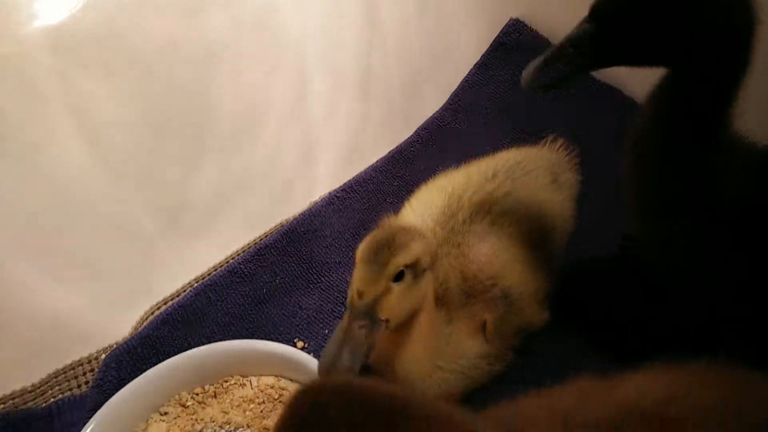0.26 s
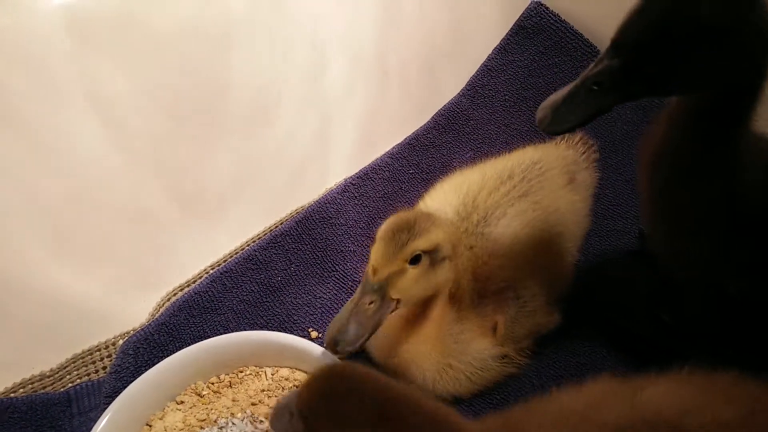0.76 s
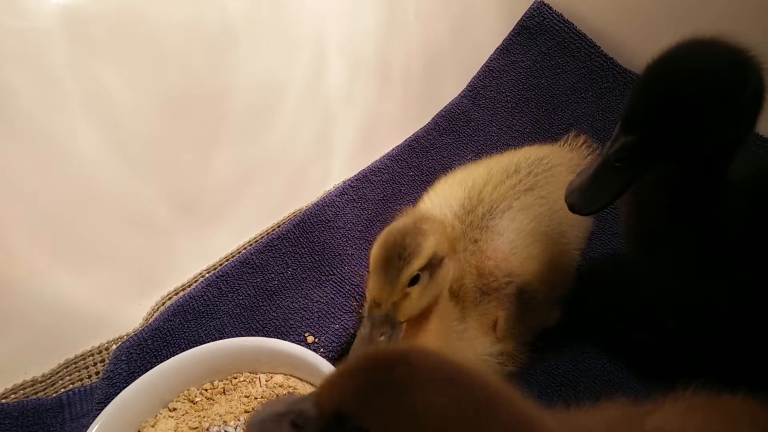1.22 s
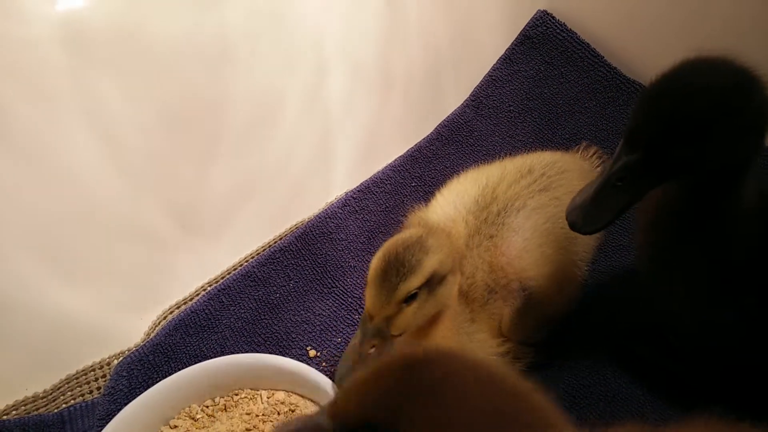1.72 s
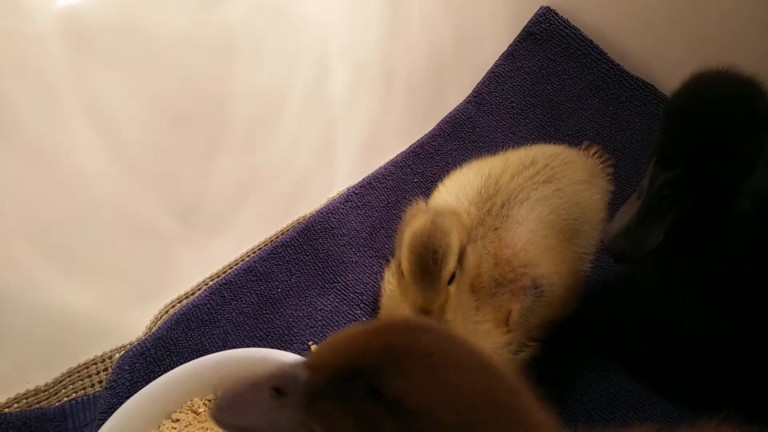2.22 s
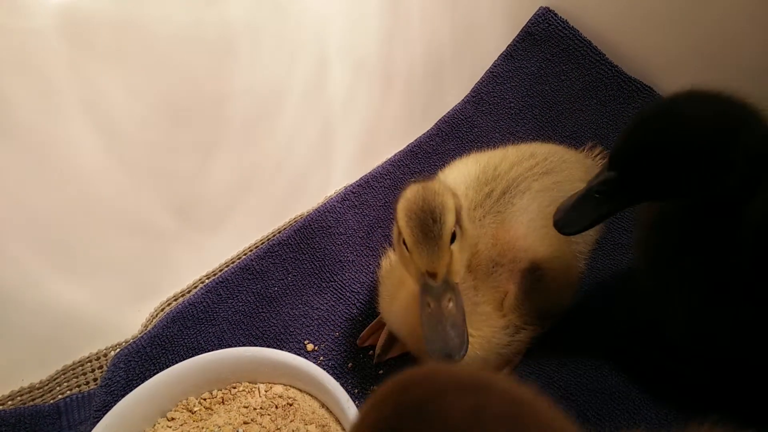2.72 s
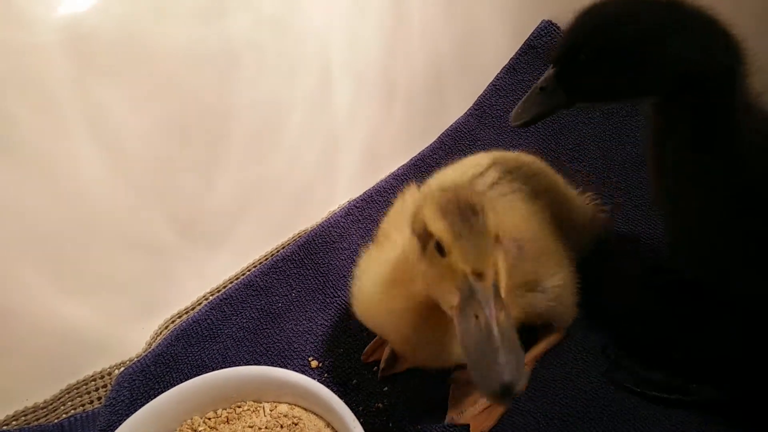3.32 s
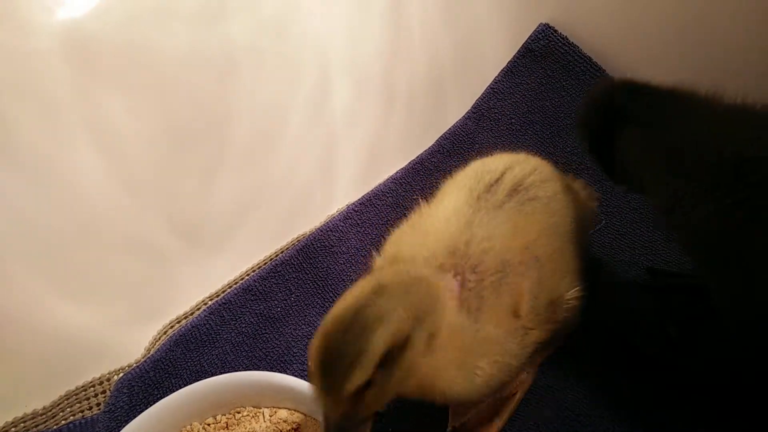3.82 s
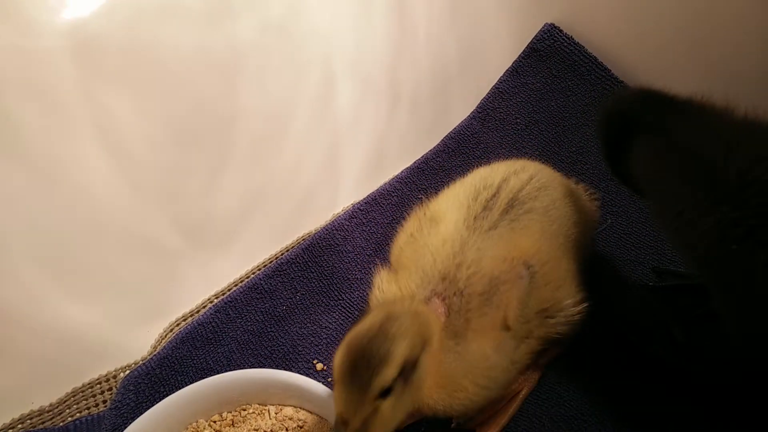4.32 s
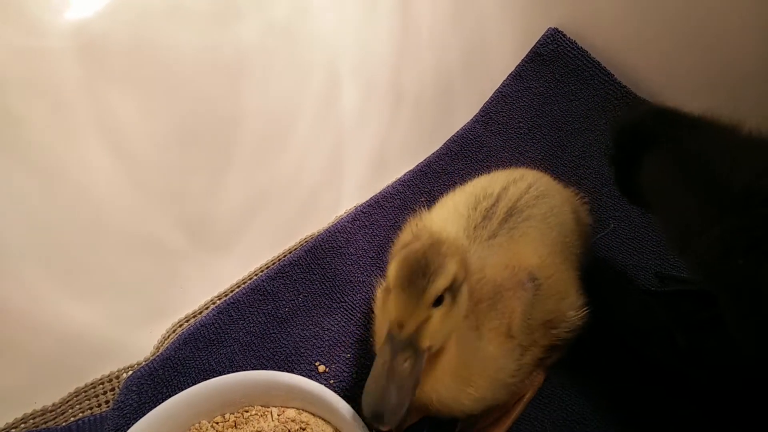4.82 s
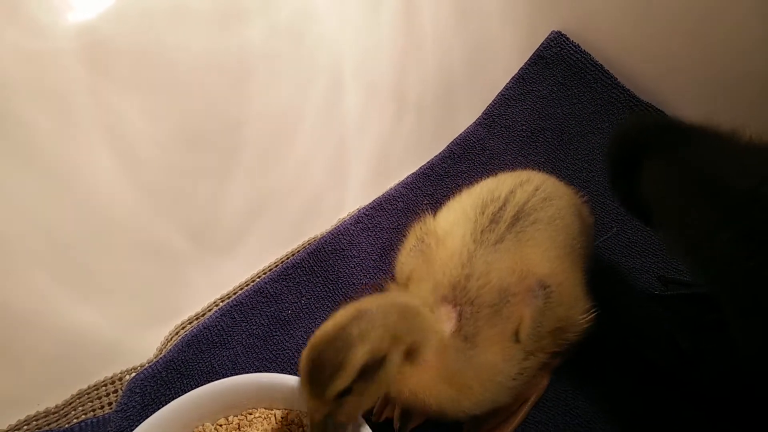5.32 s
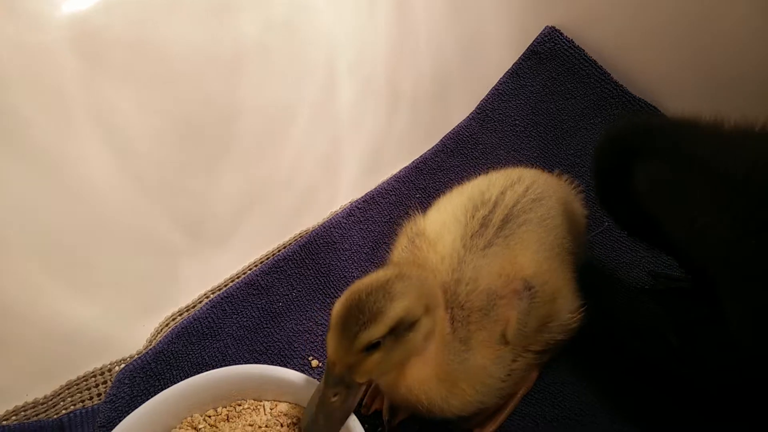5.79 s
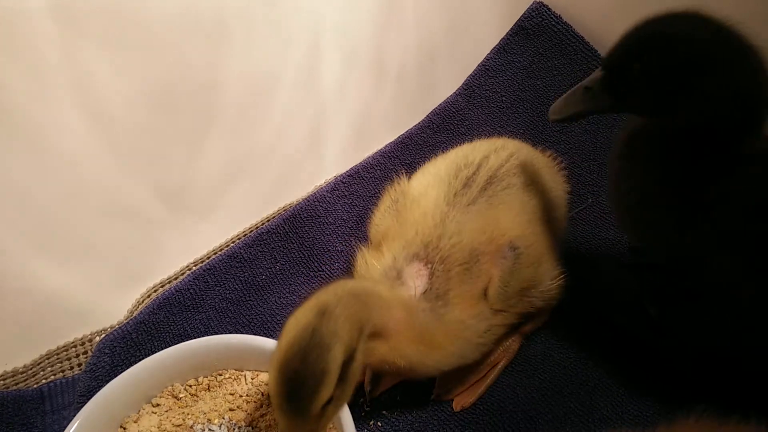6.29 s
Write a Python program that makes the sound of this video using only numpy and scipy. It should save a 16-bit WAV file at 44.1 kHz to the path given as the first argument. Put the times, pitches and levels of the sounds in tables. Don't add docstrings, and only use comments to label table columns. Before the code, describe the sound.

Ducklings give short arched peeping whistles in a hard plastic tub, bills snapping crumbs in a bowl over a low, unsteady machine hum.

```python
import sys
import numpy as np
from scipy import signal
from scipy.fft import rfft, irfft, next_fast_len
from scipy.io import wavfile
from scipy.ndimage import uniform_filter1d

SR = 44100
rng = np.random.default_rng(int(sys.argv[2]) if len(sys.argv) > 2 else 0)


def boost(x):
    u = np.asarray(x, float) / 20
    return 10 ** u


def wav_record(signal):
    frames = np.transpose(np.atleast_2d(signal))
    bounded = np.clip(frames, -1, 1)
    quanta = np.round(bounded * 32767).astype(np.int16)
    wavfile.write(sys.argv[1], SR, quanta)


N = 288855

# time in seconds, peak level in dB.
RATTLE = [(0.036, -56), (0.128, -55), (0.215, -57), (0.398, -63), (0.778, -48), (0.893, -51), (0.958, -53),
          (1.011, -53), (1.077, -57), (1.155, -50.5), (1.25, -51), (1.33, -54), (1.401, -57), (1.471, -57),
          (1.525, -59), (1.574, -54.5), (1.611, -67), (1.651, -60), (1.695, -61), (1.738, -65),
          (1.788, -64), (1.819, -72), (1.907, -58), (1.928, -61), (2.273, -53), (2.309, -51.5),
          (2.435, -64), (2.484, -62), (2.541, -65)]


def unit(x):
    return x / np.sqrt(np.mean(x ** 2) + 1e-20)


def wander(samples):
    return unit(uniform_filter1d(rng.standard_normal(N), samples))


def ports(left_right_db):
    return boost([[left_right_db / 2], [-left_right_db / 2]])


def along(points, hz):
    f, v = np.transpose(points)
    return np.interp(np.log(hz + 1), np.log(f + 1), v)


def curves(rows):
    s, *cols = np.transpose(rows)
    return [np.interp(np.arange(N) / SR, s, c) for c in cols]


def filtered(x, response):
    m = next_fast_len(N + SR // 2)
    return irfft(rfft(x, m) * response(np.fft.rfftfreq(m, 1 / SR)), m)[..., :N]


def resonances(modes):
    def response(f):
        total = 0
        for k, (centre, width, db) in enumerate(modes):
            ring = 1j * f * width / (centre * centre - f * f + 1j * f * width)
            total = total + (-1) ** k * boost(db) * ring
        return total
    return response


def rush(spectrum, alike, patchy_db, pan_db):
    z = signal.stft(rng.standard_normal((2, N)), nperseg=256)[2]
    field = uniform_filter1d(rng.standard_normal(z.shape[1:]), 8, 0)
    field = unit(uniform_filter1d(field, 6, 1))
    patchy = signal.istft(z * boost(patchy_db * np.clip(field, -2, 2)), nperseg=256)[1][:, :N]
    a, b = filtered(patchy, lambda hz: boost(along(spectrum, hz)))
    turn = np.arccos(np.clip(alike, 0, 1)) / 2
    pair = np.cos(turn) * a + np.sin(turn) * b * np.array([[1], [-1]])
    return pair / np.std(pair.mean(0)) * ports(pan_db)


def bursts(times, gains_db, t60s, modes, alike, pan_db):
    t = np.arange(round(.1 * SR)) / SR
    noise = rng.standard_normal((len(times), 3, len(t)))
    x = np.zeros((2, N + len(t)))
    for s, db, t60, chance in zip(times, gains_db, t60s, noise):
        dying = boost(db - 60 * t / np.clip(t60, .003, .2))
        x[:, round(s * SR):][:, :len(t)] += dying * (alike * chance[0] + (1 - alike) * chance[1:])
    return filtered(x[:, :N], resonances(modes)) * ports(pan_db)


def walls(x, early_db, late_db):
    # frequency in Hz, time to fall 60 dB in seconds.
    ring_times = [(200, .25), (2000, .28), (3200, .22), (4500, .12), (12000, .07)]
    hz, t, z = signal.stft(rng.standard_normal((2, SR // 2)), SR, nperseg=256)
    tail = signal.istft(z * boost(-60 * t / along(ring_times, hz)[:, None]), SR, nperseg=256)[1]
    fade_in = np.minimum(np.arange(tail.shape[1]) / 400, 1)
    tail *= boost(late_db) / np.linalg.norm(tail[0]) * fade_in
    delays = rng.integers(40, 500, (2, 6))
    tail[[[0], [1]], delays] += boost(early_db) * np.sign(rng.standard_normal((2, 6)))
    return x + signal.fftconvolve(x, tail, axes=1)[:, :N]


def shaking():
    # start in seconds, length in seconds, level in dB.
    bouts = [
        (-.05, 0.34, -60),
        (0.397, 0.065, -61),
        (0.756, 1.204, -63.5),
        (2.257, 0.34, -67.5),
        (3.956, 0.26, -69),
        (4.63, 0.61, -68.5),
        (4.807, 0.17, -60),
        (5.34, 0.64, -70),
    ]
    calm_db, swell_s, settle_s, sag_db_per_s = -76, 0.0044, 0.17, 2.5
    levels = []
    for s, d, db in bouts:
        end_db = db - sag_db_per_s * d
        levels += curves([(s, calm_db), (s + swell_s, db), (s + d, end_db), (s + d + settle_s, calm_db)])
    return np.max(levels, axis=0)


def beats():
    x = np.bincount((np.transpose(RATTLE)[0] * SR).astype(int), minlength=N)
    return np.convolve(x, np.hanning(round(2 * .022 * SR)), "same")


def drone():
    # time in seconds, pitch in Hz, level in dB.
    motor_points = [(0.0, 74.76, -50.5), (0.47, 74.3, -64), (0.56, 76.5, -62), (0.69, 71.76, -57),
                    (1.33, 82.7, -55.5), (1.48, 72.45, -56), (1.81, 76.6, -53.5), (2.11, 70.4, -68),
                    (2.32, 77.2, -56.5), (2.59, 72.2, -63), (3.87, 77.2, -57.5), (4.03, 78.1, -85),
                    (4.1, 76.9, -44), (4.3, 72.1, -63), (4.67, 76, -57), (5.78, 71.47, -59.5),
                    (5.89, 76.4, -60.5), (6.55, 73.9, -64)]
    hz, db = curves(motor_points)
    sway = uniform_filter1d(rng.standard_normal((2, N)), 3000)
    sway = unit(uniform_filter1d(sway, 3000))
    tone = boost(db + 3.1 * sway[0]) * np.sin(2 * np.pi * np.cumsum(hz + 3 * sway[1]) / SR)
    return tone * ports(-2.2)


def machine(rumble_db):
    # frequency in Hz, level in dB per Hz.
    hum_spectrum = [(25, -70), (45, -8.5), (60, -13), (70, 0.5), (74, 1), (79, -6.5), (100, -8.5),
                    (200, -39), (300, -73)]
    rumble_spectrum = [(65, -34), (110, -2.5), (230, -8.5), (284, -18), (415, -22), (449, -19), (545, -12),
                       (900, -32), (1170, -83.5), (1980, -120)]
    hum_db = -59.5 + 0.05 * (rumble_db - rumble_db.mean())
    hum = boost(hum_db) * rush(hum_spectrum, alike=0.97, patchy_db=-4.0, pan_db=-2)
    swelling_db = rumble_db + 7 * beats()
    rumble = boost(swelling_db) * rush(rumble_spectrum, alike=0.95, patchy_db=1.4, pan_db=-2.0)
    left, right = hum + rumble + drone()
    return np.array([np.roll(left, 9), right])


def rustling(rumble_db):
    # time in seconds, level in dB.
    bustle = [(0.0, -68), (0.73, -73.5), (1.07, -66.5), (1.28, -71.5), (1.88, -73), (2.06, -74),
              (2.77, -78), (3.01, -73), (3.23, -66), (3.61, -71), (4.03, -68), (4.69, -68.5), (4.98, -70),
              (5.18, -71.5), (5.4, -76.5), (5.54, -66.5), (6.04, -70), (6.55, -72.5)]
    # frequency in Hz, level in dB.
    scuff_spectrum = [(700, -50.5), (900, -3), (1500, -1), (2500, -8), (4000, -12.5), (5000, -18.5)]
    rustle_spectrum = [(1470, -14), (2500, -9), (4000, -11.5), (5490, -7.5), (6510, -4.5), (7310, 1),
                       (8790, -5.5), (10100, -13), (15800, -16)]
    rustle_db, = curves(bustle)
    scuff_db = -76.5 + 0.4 * (rustle_db - rustle_db.mean()) + 0.66 * (rumble_db - rumble_db.mean())
    grains = unit(boost(2.5 * wander(90) + 1.5 * wander(1500)))
    scuff = boost(scuff_db) * rush(scuff_spectrum, alike=0.019, patchy_db=5.5, pan_db=3.0)
    rustle = boost(rustle_db) * grains * rush(rustle_spectrum, alike=0.033, patchy_db=3.0, pan_db=-7.5)
    return scuff + rustle


def hiss():
    # frequency in Hz, level in dB.
    hiss_spectrum = [(120, -77), (200, -22), (254, -4.5), (416, -5.5), (599, -26.5), (681, -10.5),
                     (746, -14), (3400, -34.5), (7890, -24), (15800, -24)]
    return boost(-75.5) * rush(hiss_spectrum, alike=0.21, patchy_db=6.0, pan_db=-3.5)


def knocks():
    # time in seconds, peak in dB, bass in dB above the peak.
    foot_blows = [(3.006, -66, 12), (3.489, -63, 17.5), (3.777, -66, 18), (4.084, -48.5, 10.5),
                  (4.524, -61, 12), (4.576, -63, 18.5), (4.609, -52.5, 3), (4.664, -44.5, -4),
                  (4.759, -55, 18.5), (5.386, -53.5, 6), (5.781, -53, -41), (5.88, -55.5, 15),
                  (6.014, -59.5, 11.5)]
    # time in seconds, level in dB, time to fall 60 dB in seconds.
    thumps = [
        (4.083, -9.5, 0.23),
        (4.125, -16, 0.16),
        (4.158, -21, 0.24),
    ]
    # frequency in Hz, width in Hz, level in dB.
    tub_modes = [(470, 55, -2), (568, 50, -1), (651, 107, -3), (917, 270, -16)]
    floor_modes = [(76.4, 23, -1), (170, 53, -12), (230.4, 46, -13)]
    board_modes = [(76.6, 15, 4.5), (201, 92, -12.5)]
    rattle_bass_db = 9.5
    rattles = [(s, db, rattle_bass_db) for s, db in RATTLE]
    s, db, bass_db = np.transpose(rattles + list(foot_blows))
    blows = np.zeros((2, N))
    blows[:, np.round(s * SR).astype(int)] = boost(db + 30.5) * ports(-3)
    wall = filtered(blows, resonances(tub_modes))
    wall += bursts(s, db + 12.5, 0.059 + 0 * s, tub_modes, alike=0.53, pan_db=-3.0)
    wall = filtered(wall, lambda hz: resonances([(560, 400, 1.6)])(hz) ** 2)
    floor = bursts(s, db + bass_db + 20, 0.16 + 0 * s, floor_modes, alike=0.7, pan_db=-2.0)
    return wall + floor + bursts(*np.transpose(thumps), board_modes, alike=0.78, pan_db=-1.5)


def arch(row, shape, throat):
    s, crest_hz, effort_db, rise, fall = row
    u = np.linspace(-1, 1, num=33)
    length, bend, lost_db, late = [np.where(u < 0, a, b) for a, b in [(rise, fall), *shape]]
    rest_hz = min(1340, .94 * crest_hz)
    hz = crest_hz - (crest_hz - rest_hz) * abs(u) ** bend
    return np.transpose([s + u * length, hz, effort_db + along(throat, hz) - lost_db * abs(u) ** late])


def whistle(call, overtones_db, place, by_effort):
    s, *cols = np.transpose(call)
    n = np.arange(round(s[0] * SR), round(s[-1] * SR))
    hz, db = [uniform_filter1d(np.interp(n / SR, s, c), 220, mode="nearest") for c in cols]
    edge = np.clip(np.minimum(n - n[0], n[-1] - n) / 180, 0, 1)
    turn = 2 * np.pi * np.cumsum(hz) / SR
    f, pan_db, lead = np.transpose(place)
    half = boost(np.interp(hz, f, pan_db) / 2) * np.exp(.5j * np.interp(hz, f, lead))
    pair = np.array([half, 1 / half]) / np.maximum(abs(half + 1 / half) / 2, .4)
    sound = np.imag(pair * np.exp(1j * turn))
    flutter = rng.standard_normal((4, 4 + len(n) // 140))
    effort_db = by_effort * (db - db.max()) - 36 * (1 - hz / hz.max())
    overtone_pan_db = [-3.5, -9.5, -10.5, -10.5]
    for k, overtone_db in enumerate(overtones_db):
        patchy_db = 5 * np.interp(n, np.linspace(n[0], n[-1], len(flutter[k])), flutter[k]) + effort_db
        tone = np.sin((k + 2) * turn + [[0], [k]])
        sound = sound + boost(overtone_db + patchy_db) * ports(overtone_pan_db[k]) * tone
    return n, np.sqrt(2) * edge * boost(db) * sound


def peeps():
    # time in seconds, pitch in Hz, level in dB.
    first_pair = [
        [(0.126, 1442, -67), (0.136, 1974, -46.5), (0.142, 2204, -40.5), (0.15, 2653, -44),
         (0.162, 2720, -40.5), (0.172, 2723, -45), (0.182, 2130, -53), (0.2, 1858, -57.5), (0.228, 1576, -67)],
        [(0.242, 1855, -54), (0.252, 2140, -37), (0.26, 2430, -44.5), (0.27, 2467, -40.5), (0.282, 2417, -46),
         (0.29, 2030, -49), (0.299, 1610.0, -72)],
    ]
    long_pair = [
        [(3.153, 1540, -73), (3.168, 1928, -49.5), (3.185, 2050, -43.5), (3.215, 2053, -50.5),
         (3.24, 2275, -40), (3.258, 2452, -44), (3.275, 2280, -47), (3.29, 1928, -51), (3.3, 1690, -57)],
        [(3.315, 1793, -75), (3.335, 1955, -38.5), (3.35, 2116, -39.5), (3.36, 2254, -32), (3.368, 2237, -37.5),
         (3.374, 2000, -41.5), (3.381, 1380, -62)],
    ]
    shy_pair = [
        [(3.779, 1326, -61), (3.79, 1674, -60), (3.806, 1930, -56), (3.82, 1807, -61), (3.835, 1470, -67)],
        [(3.85, 1590, -61.5), (3.868, 1890.0, -49.5), (3.882, 2206, -41.5), (3.892, 2262, -38.5),
         (3.905, 2140, -45.5), (3.915, 1760, -53.5), (3.927, 1340.0, -68)],
    ]
    last_pair = [
        [(4.638, 1450, -63), (4.648, 1820, -49.5), (4.658, 2052, -36), (4.67, 2248, -42.5), (4.68, 2174, -50),
         (4.69, 1980, -40), (4.705, 1680, -62), (4.72, 1562, -55.5), (4.745, 1469, -85)],
        [(4.76, 1568, -67), (4.775, 1860, -51), (4.786, 2017, -37), (4.8, 2155, -44), (4.812, 2082, -41),
         (4.83, 1720, -65), (4.85, 1550, -73), (4.862, 1470, -71)],
    ]
    # time in seconds, pitch in Hz, level in dB.
    near_peeps = [
        [(1.099, 1818, -52), (1.106, 2160, -39), (1.113, 2570, -43.5), (1.122, 3085, -61), (1.132, 2883, -48),
         (1.143, 2335, -50), (1.154, 2104, -44.5), (1.163, 1860, -50)],
        [(3.967, 1500, -58), (3.98, 1807, -52.5), (3.992, 2102, -37), (4.002, 2236, -39), (4.01, 1996, -40.5),
         (4.022, 1461, -65)],
        [(1.199, 1518, -66), (1.21, 1978, -39.5), (1.22, 2200, -39), (1.23, 2390, -37), (1.241, 2474, -39.5),
         (1.25, 2364, -36), (1.257, 2005, -41.5), (1.265, 1770, -65)],
        [(1.208, 1839, -70), (1.217, 2076, -38), (1.228, 2141, -37), (1.238, 2197, -42), (1.248, 2176, -36.5),
         (1.256, 1896, -43.5), (1.264, 1750, -56)],
    ]
    sharp_peeps = [
        [(3.043, 1564, -80), (3.052, 1890, -51), (3.068, 2170, -49.5), (3.082, 2190, -44),
         (3.095, 1890.0, -44.5), (3.108, 1520, -62.5), (3.123, 1360.0, -68)],
        [(3.676, 1330, -85), (3.683, 1930, -48), (3.692, 2480, -48), (3.707, 2772, -44.5), (3.72, 2725, -45),
         (3.733, 2300, -38.5), (3.745, 1890.0, -50), (3.754, 1646, -68)],
    ]
    soft_peeps = [
        [(5.59, 1303, -75), (5.597, 1564, -66), (5.603, 1595, -57), (5.61, 1552, -74), (5.622, 1580, -64),
         (5.634, 1550, -72)],
        [(5.687, 1450, -70), (5.694, 1570, -55.5), (5.702, 1632, -52.5), (5.712, 1600, -55.5),
         (5.725, 1484, -61), (5.735, 1590, -69), (5.75, 1600, -83)],
    ]
    # crest time in seconds, crest in Hz, effort in dB, rise and fall in seconds.
    arched_peeps = [
        (0.9, 2090, -42, 0.029, 0.03),
        (1.08, 1890, -47.5, 0.022, 0.018),
        (2.785, 1884, -46.5, 0.023, 0.04),
    ]
    # power of the arch, breath lost at the end in dB, how late it is lost.
    arch_shape = [(2.6, 1.92), (14.5, 20), (1.9, 5.2)]
    # pitch in Hz, level in dB.
    arch_throat = [(1400, -4.5), (1700, -1.5), (2050, -3), (2250, -3), (2600, 1), (2950, -6)]
    # second to fifth overtone of one call, in dB beside the whistle.
    pair_voices = [(-22.5, -21.5, -36, -44), (-23.5, -25, -28, -35), (-29, -29, -38, -40),
                   (-33, -31, -42, -45)]
    near_voices = [(-11, -9, -21, -38), (-34, -26, -27, -26), (-24, -35, -30, -38),
                   (-26.5, -32, -32, -25.5)]
    sharp_voices = [(-22, -15, -21, -30), (-17, -15.5, -25, -38)]
    soft_voices = [(-29, -35, -40, -45), (-16.5, -19, -42, -45)]
    arch_voices = [(-26, -16.5, -14.5, -34), (-20.5, -34, -32, -36), (-24.5, -23.5, -17.5, -36)]
    # frequency in Hz, left over right in dB, lead of the left in radians.
    near = [(1500, 7, 4.5), (1750, 2.5, 3.5), (1844, 10, 2.5), (2170, -1, 0.9), (2300, -4, 1),
            (2530, -6, 0.9), (2820, -12, -0.5)]
    far = [(1470, 6, 1.67), (1690, -3, 1.34), (2140, -6, 0.8), (2500, 2, -0.83), (2880, -7, -2)]
    # time in seconds, pitch in Hz, level in dB, length in seconds.
    side_tones = [(0.27, 3230, -61.5, 0.023), (0.9, 2588, -52.5, 0.031), (0.93, 3600, -66, 0.029),
                  (3.067, 2750, -45.5, 0.018), (3.235, 2720, -62, 0.11), (4.75, 4400, -62, 0.018),
                  (3.395, 4580, -62, 0.01), (5.672, 4800, -60, 0.0096), (3.892, 2810, -54, 0.013),
                  (4.681, 2680, -51.5, 0.012), (4.888, 4700, -50, 0.012), (4.676, 4450, -56, 0.0271),
                  (4.3, 6600, -67, .02)]
    pairs = [[*a, *b] for a, b in (first_pair, long_pair, shy_pair, last_pair)]
    arches = [arch(row, arch_shape, arch_throat) for row in arched_peeps]
    kinds = [(pairs, pair_voices, near, .2), (near_peeps, near_voices, near, .6),
             (sharp_peeps, sharp_voices, far, .4), (soft_peeps, soft_voices, far, .1),
             (arches, arch_voices, far, .9)]
    calls = []
    for rows, voices, place, by_effort in kinds:
        calls += [(call, voice, place, by_effort) for call, voice in zip(rows, voices)]
    for s, hz, db, d in side_tones:
        tone = [(s - d / 2, hz, db - 9), (s, hz, db), (s + d / 2, .95 * hz, db - 9)]
        calls.append((tone, [-120], far, 0))
    out = np.zeros((2, N))
    for call in calls:
        n, sound = whistle(*call)
        out[:, n] += sound
    return walls(out, early_db=-23.0, late_db=-11.0)


def pecks():
    # time in seconds, peak in dB.
    crumbs = [(1.565, -56), (1.666, -65), (1.6913, -55.5), (1.8423, -48), (2.026, -52.5), (2.9959, -58),
              (3.2323, -52), (3.531, -52), (3.945, -51.5), (4.224, -48.5), (4.373, -71), (4.3904, -60),
              (5.551, -76), (5.6223, -52.5), (6.0292, -74), (6.2994, -56), (6.383, -53), (6.529, -56)]
    bowl_pecks = [(0.759, -58), (1.287, -54), (1.994, -56), (3.489, -71), (4.151, -45), (4.32, -68),
                  (4.4152, -46.5), (4.467, -57), (4.524, -51), (4.7236, -44), (4.8332, -44), (5.003, -44),
                  (5.02, -62), (5.115, -46), (5.1755, -45), (5.3422, -51.5), (5.448, -46.5), (5.5676, -43),
                  (5.881, -50), (6.0142, -52)]
    rim_taps = [(1.008, -61), (3.0099, -58.5), (4.258, -64), (4.36, -65), (5.398, -67), (5.505, -60),
                (4.612, -60), (4.665, -52.5), (4.779, -61), (4.89, -56), (5.782, -55), (5.8, -61.5),
                (5.8421, -64)]
    ploughs = [
        (0.7793, -61.5),
        (2.282, -70.5),
        (4.018, -59),
        (3.9, -63.5),
        (5.382, -60.5),
        (5.498, -62.5),
        (6.321, -63),
        (6.412, -64),
    ]
    husks = [(1.496, -44.5), (1.566, -49.5), (1.666, -55), (1.696, -50), (3.75, -53), (4.01, -50),
             (2.972, -54), (3.022, -61), (3.1487, -55), (3.1968, -49), (3.291, -52), (3.361, -40),
             (3.502, -48), (3.553, -50), (3.565, -54), (5.69, -47.5), (6.066, -56), (6.1, -48.5)]
    ticks = [(1.0065, -50), (3.143, -49), (3.3674, -51), (4.1876, -44), (4.2354, -45), (4.307, -48),
             (4.351, -48), (4.3754, -58), (4.3955, -48), (4.472, -52), (4.5575, -49), (4.577, -45),
             (5.3971, -43.5), (5.5037, -40), (5.8484, -47.5)]
    # bowl knock in dB beside the peak, time to fall 60 dB in seconds, rolling crumbs in dB beside it.
    peck_kinds = [
        (-53, 0.017, -1),
        (-20.5, 0.019, -0.5),
        (-8, 0.0026, -31),
        (-19.5, 0.26, 16),
    ]
    # frequency in Hz, width in Hz, level in dB.
    snap_modes = [(4570, 2460, -7.5), (7320, 1370, 0.5), (15000, 560, -17.5)]
    crack_modes = [(6500, 4000, -3), (11500, 5000, -7), (15000, 2500, -10)]
    husk_modes = [(8040, 3100, 0.55), (11600, 5100, -1.6)]
    tick_modes = [(2900, 1200, -8.5), (6850, 2300, -1), (13100, 4000, -20)]
    bowl_modes = [(1300, 570, -0.32), (2810, 300, -0.7)]
    rim_modes = [(940, 950, 7.1), (1450, 430, 4)]
    events = []
    for rows, kind in zip((crumbs, bowl_pecks, rim_taps, ploughs), peck_kinds):
        events += [(*row, *kind) for row in rows]
    s, db, bowl_db, t60, spill_db = np.transpose(events)
    rim_s, rim_db = np.transpose(rim_taps)
    husk_s, husk_db = np.transpose(husks)
    tick_s, tick_db = np.transpose(ticks)
    db = db - 8 * np.isin(s, rim_s)
    snap = bursts(s, db + 12.5, t60, snap_modes, alike=0.023, pan_db=-5.0)
    snap += bursts(s, db + 1, t60 / 4, crack_modes, alike=0.5, pan_db=-6)
    snap += bursts(s, db + spill_db, .2 + 0 * s, snap_modes, alike=0.1, pan_db=-7.5)
    snap += bursts(husk_s, husk_db + 5.5, 0.02 + 0 * husk_s, husk_modes, alike=0.18, pan_db=-8.0)
    snap += bursts(tick_s, tick_db + 6, 0.0087 + 0 * tick_s, tick_modes, alike=0.28, pan_db=-9)
    tap = bursts(s, db + bowl_db + 28.5, 1.06 * t60, bowl_modes, alike=0.93, pan_db=1.5)
    tap += bursts(rim_s, rim_db + 12, 0.014 + 0 * rim_s, rim_modes, alike=0.98, pan_db=-6.5)
    return walls(snap + tap, early_db=-30, late_db=-9)


def strokes():
    # start and end in seconds, from and to frequency in Hz, level in dB.
    slides = [
        (4.165, 4.242, 6220, 6500, -57),
        (1.157, 1.217, 7800, 9040, -56),
        (1.166, 1.202, 11000, 12400, -63),
        (4.745, 5.1, 8930, 8740, -61.5),
        (5.58, 5.67, 5500, 9700, -60),
        (5.592, 5.691, 8030, 10840, -55.5),
        (5.683, 5.804, 9500, 8630, -64),
    ]
    out = np.zeros((2, N))
    for start, end, from_hz, to_hz, db in slides:
        n = np.arange(round(start * SR), round(end * SR))
        width_hz = 1300 + .1 * abs(to_hz - from_hz)
        band = unit(uniform_filter1d(rng.standard_normal((2, len(n))), round(SR / width_hz)))
        carrier = np.sin(2 * np.pi * np.cumsum(np.linspace(from_hz, to_hz, len(n))) / SR)
        out[:, n] += boost(db) * np.hanning(len(n)) ** .5 * band * carrier
    return out * ports(-6)


def scrape():
    # time in seconds, rub in dB, squeak in dB.
    drag = [
        (4.86, -61, -85),
        (4.93, -53.5, -77),
        (5, -61, -72),
        (5.045, -57, -55.5),
        (5.11, -64, -69.5),
        (5.27, -77.5, -100),
    ]
    # frequency in Hz, width in Hz, level in dB.
    sole_modes = [(244, 84, 4.4), (562, 300, 6.3), (1711, 44, 7.3), (1890, 160, 10.2), (2200, 740, 2.5)]
    squeak_modes = [(920, 31, 1), (1061.7, 55, 1.5), (1650, 290, -6.5)]
    before, after = (drag[0][0] - .05, -110, -110), (drag[-1][0] + 0.068, -110, -110)
    rub_db, squeak_db = curves([before] + list(drag) + [after])
    rub = filtered(rng.standard_normal((2, N)), lambda hz: resonances(sole_modes)(hz) ** 2)
    squeak = filtered(rng.standard_normal((2, N)), lambda hz: resonances(squeak_modes)(hz) ** 2)
    catches = boost(2 * wander(250))
    return boost(rub_db + 1) * unit(catches * rub) + boost(squeak_db) * unit(squeak)


def scene():
    rumble_db = shaking()
    background = machine(rumble_db) + rustling(rumble_db) + hiss()
    return background + knocks() + peeps() + pecks() + strokes() + scrape()


def low_pass(x):
    return signal.sosfilt(signal.butter(12, 16440, fs=SR, output="sos"), x)


def record(dry):
    heard = filtered(dry, lambda hz: (hz < 15900) * hz ** 4 / (hz ** 4 + 42.7 ** 4))
    return low_pass(heard)


dry = scene()
out = record(dry)
wav_record(out)
```